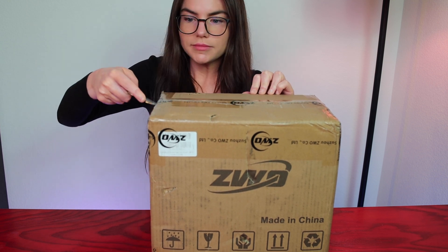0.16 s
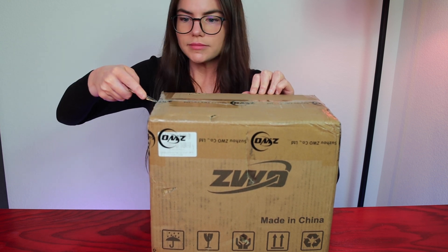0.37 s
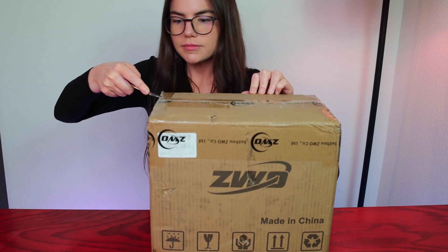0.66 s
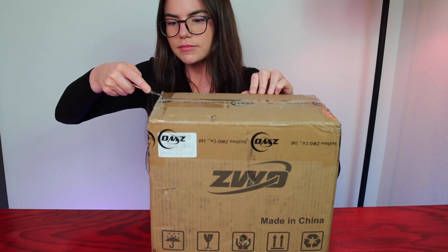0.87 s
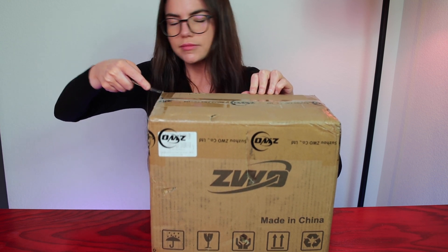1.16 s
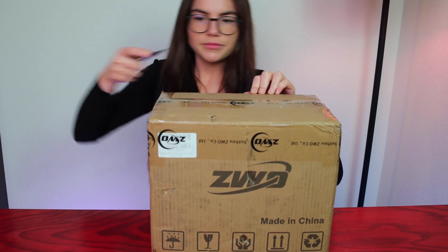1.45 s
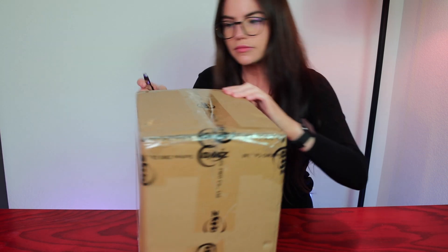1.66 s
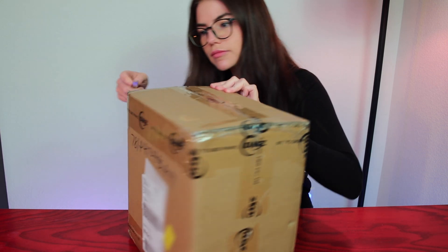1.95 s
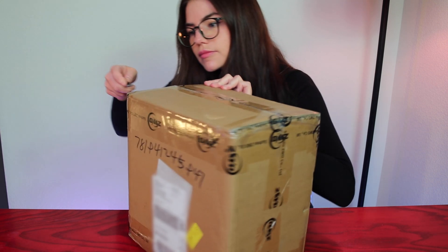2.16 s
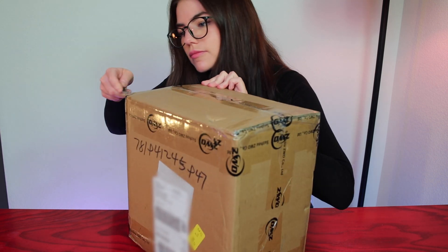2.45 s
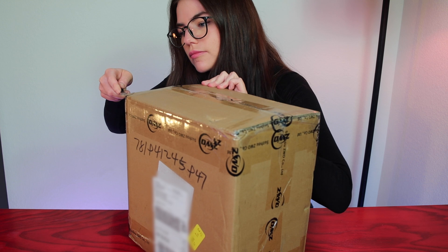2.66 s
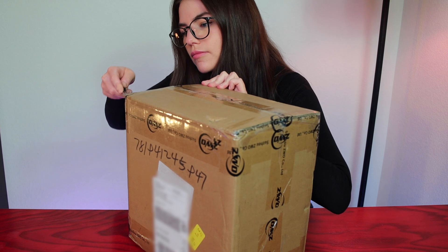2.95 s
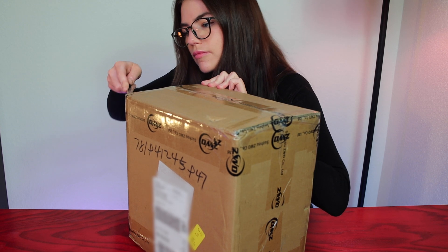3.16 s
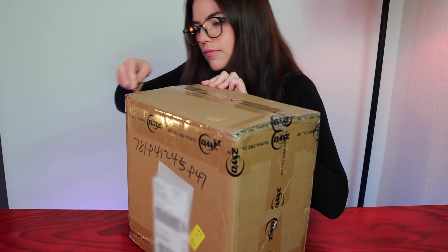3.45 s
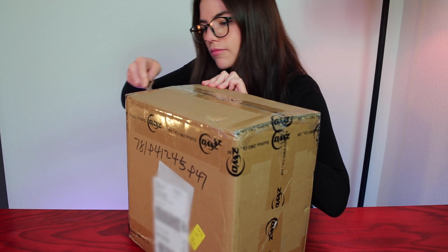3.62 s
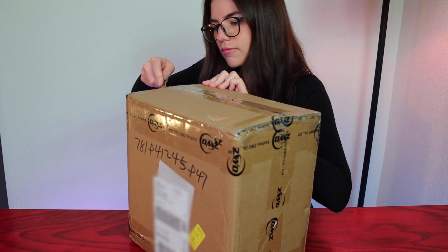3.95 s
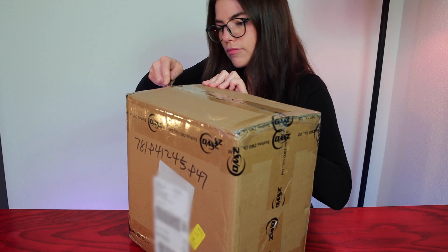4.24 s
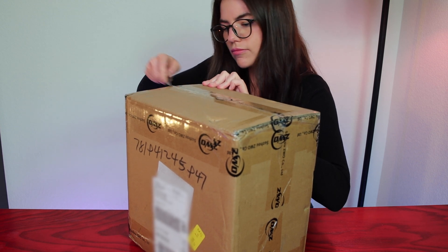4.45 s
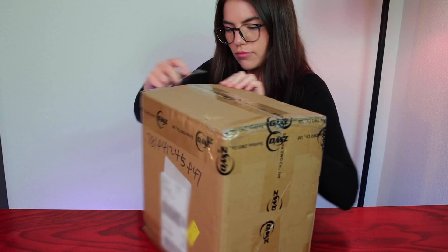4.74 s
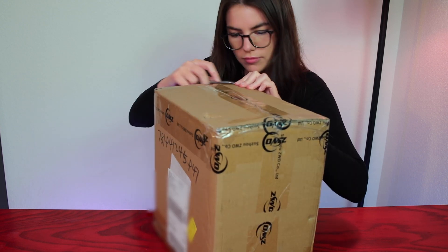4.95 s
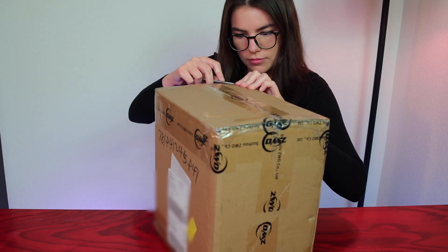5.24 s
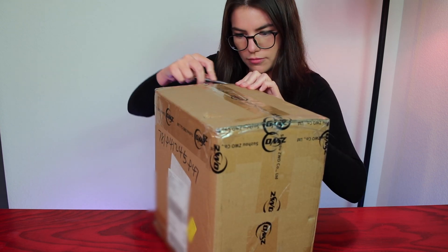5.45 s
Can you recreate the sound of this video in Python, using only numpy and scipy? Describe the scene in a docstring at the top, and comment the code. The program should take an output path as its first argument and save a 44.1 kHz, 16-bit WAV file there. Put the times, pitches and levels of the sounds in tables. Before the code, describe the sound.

A box cutter pops through packing tape and rasps along the edge of a large cardboard box, making the panels boom hollowly. The box is turned, hissing and scuffing over a table, with a few tape clicks. Then the blade cuts the top seam in rough, snapping strokes, pausing for one more brief turn. Everything is close to the microphone in a small room with a faint fan hum.

```python
"""A box cutter pops through packing tape and rasps along the side edge of a big cardboard box.
The blade moves in tiny slips that set the panels booming, while the tape fizzes as it tears.
The box is turned and hisses over the table top, then the top seam is cut, with one more turn midway.
It is all close by in a small room, where a fan hums faintly."""
import sys
import numpy as np
from scipy import signal
from scipy.fft import rfft, irfft, next_fast_len
from scipy.io import wavfile

SR = 44100
rng = np.random.default_rng(int(sys.argv[2]) if len(sys.argv) > 2 else 0)


def put_to_file(sound):
    """Save the sound as 16-bit audio at rate SR, in the file named by the first command-line argument."""
    columns = np.atleast_2d(sound).T  # one column per channel
    safe = np.clip(columns, -1, 1)
    whole_steps = np.round(safe * 32767)
    wavfile.write(sys.argv[1], SR, whole_steps.astype(np.int16))


N = 246078
TIME = np.arange(N) / SR


def from_db(db):
    """Turn decibels into a gain."""
    return 10 ** (np.asarray(db) / 20)


def unit(response):
    """Scale a response so that white noise keeps its power going through it."""
    return response / np.sqrt(np.sum(response ** 2) + 1e-20)


def through(x, response):
    """Play x through something that answers one tap with this response."""
    return signal.fftconvolve(x, response)[:N]


def at_hz(points, hz):
    """Read a table between its rows, with octaves evenly spaced."""
    known_hz, values = np.transpose(points)
    return np.interp(np.log(np.maximum(hz, 1)), np.log(known_hz), values)


def colour(spectrum, size=4096):
    """The quickest (minimum-phase) response to a tap that has this tone colour."""
    gains = from_db(at_hz(spectrum, np.fft.rfftfreq(size, 1 / SR)))
    cepstrum = irfft(np.log(gains))
    cepstrum[1:size // 2] *= 2
    cepstrum[size // 2 + 1:] = 0
    return unit(irfft(np.exp(rfft(cepstrum))))


def ringing(notes, t):
    """A tapped object rings with several fading notes at once."""
    return unit(sum((-1) ** k * from_db(db - 60 * t / fade_s) * np.sin(2 * np.pi * hz * t)
                    for k, (hz, db, fade_s) in enumerate(notes)))


def drift(per_s):
    """A random wander, about 1 in size, with per_s new values a second."""
    knots = rng.standard_normal(N // 50)
    wander = np.interp(TIME * per_s, np.arange(len(knots)), knots)
    return wander / np.std(wander)


def swell(peak_s, rise_s, fall_s, swing_db=22):
    """Gain of one push: it climbs by swing_db to 1 at the peak and eases off again."""
    away = np.maximum((peak_s - TIME) / rise_s, (TIME - peak_s) / fall_s)
    return from_db(-swing_db * np.clip(away, 0, 10) ** 1.147)   # power 1 = pointed peak, 2 = rounded


# tone colour of the fan's air: f/Hz, level/dB
FAN_AIR = [(15, -46), (25, -26), (123, -11.5), (185, -13.5), (242, -7.5), (317, -10), (354, -13),
           (607, -22), (754, -20.5), (818, -21), (962, -28), (4870, -38), (5730, -35.5), (13600, -39.5),
           (16000, -39)]
def fan(air_db, hum_db, hum_hz):
    """A dull rush of air with a wavering hum."""
    air = from_db(air_db) * through(rng.standard_normal(N), colour(FAN_AIR))
    phase = 2 * np.pi * np.cumsum(hum_hz + 5.82 * drift(30)) / SR
    return air + from_db(hum_db + 3.5 * drift(9)) * np.sqrt(2) * np.sin(phase)


# how long the room's echo lasts: f/Hz, time to fade by 60 dB/s
ROOM_FADE = [(150, 0.067), (1000, 0.28), (5000, 0.23), (14000, 0.13)]
def room(x, echo_db, treble_db, first_s):
    """Echoes off the walls begin a moment late and die away, each band at its own pace."""
    t, tail = TIME[:SR // 2], 0
    edges_hz = np.geomspace(170, 17000, 8)
    for low, high in zip(edges_hz, edges_hz[1:]):
        bandpass = signal.butter(2, [low, high], "band", fs=SR, output="sos")
        band = signal.sosfilt(bandpass, rng.standard_normal(len(t)))
        hz = np.sqrt(low * high)
        tail = tail + band * from_db(treble_db * np.log10(hz / 1000) - 60 * t / at_hz(ROOM_FADE, hz))
    onset = np.clip(t / first_s - 1, 0, 1)
    return from_db(echo_db) * through(x, unit(tail * onset))


# notes of the cardboard panels and the air inside:
# f/Hz, time to fade by 60 dB/s, level touched at the edge/dB, level touched on the top seam/dB
BOX_NOTES = [(66.6, 0.1, -7.5, -7), (106.7, 0.076, -1.5, -1.5), (141.6, 0.12, -4, -4.5),
             (166.7, 0.15, -7.5, -9.5), (263, 0.049, -1, 6), (321, 0.083, -5, 4), (378, 0.052, -4, 1.5),
             (419, 0.032, -2, 7.5), (559.5, 0.08, -5.5, -26)]
def panels(place):
    """The box rings: where it is touched decides how loud each note is."""
    notes = [(hz, edge_db if place == "edge" else seam_db, fade_s)
             for hz, fade_s, edge_db, seam_db in BOX_NOTES]
    return ringing(notes, TIME[:SR // 4])


# shoves that turn the box: start t/s, length/s, relative hiss at full speed/dB
SHOVES = [(1.516, 0.49, -43), (1.774, 0.67, -42), (4.612, 0.51, -44.5)]
# the box's bottom catches on the table: peak t/s, relative hiss/dB, relative rumble/dB
SCUFFS = [(1.56, -50.5, -40.5), (1.825, -61, -46), (2.095, -42.5, -36.5), (4.665, -67, -36.5)]
# tone colour of the sliding: f/Hz, level/dB
SLIDE_HISS = [(210, -1), (350, 3.5), (622, -3), (943, -3.5), (1070, 0), (1760, -5), (1910, -4), (2750, -6),
              (2980, -10), (5660, -9), (11800, -14.5), (14100, -10), (16000, -19)]
def sliding(hiss_gain_db, rumble_gain_db):
    """Cardboard on a smooth table hisses more as it speeds up; the panels rumble where it catches."""
    hiss = 0
    for start_s, length_s, db in SHOVES:
        speed = np.abs(np.sin(np.pi * np.clip((TIME - start_s) / length_s, 0, 1)))
        hiss = hiss + from_db(db) * speed ** 1.35
    rumble = hiss * from_db(-18.5)
    for s, hiss_db, rumble_db in SCUFFS:
        catch = swell(s, rise_s=0.051, fall_s=0.082)
        hiss = np.hypot(hiss, catch * from_db(hiss_db))
        rumble = np.hypot(rumble, catch * from_db(rumble_db))
    friction = rng.standard_normal(N) * from_db(0.36 * drift(51))
    return (from_db(hiss_gain_db) * through(friction * hiss, colour(SLIDE_HISS))
            + from_db(rumble_gain_db) * through(friction * rumble, panels("seam")))


# the blade or a hand bumps the cardboard: t/s, clack/dB, thump/dB
KNOCKS = [(0.0504, -23, -28), (0.1355, -33, -28.5), (0.2921, -30, -18), (0.3878, -30, -32.5),
          (.8854, -40, -31), (1.261, -39, -28), (1.4597, -43.5, -38), (1.814, -42, -37),
          (3.0902, -40.5, -37.5), (3.1973, -31, -34), (4.1622, -28.5, -24.5), (5.1432, -42.5, -53)]
# tape and cardboard click under the hands: t/s, crack/dB, crack f/Hz, clack/dB
CLICKS = [ (0.0486, -18.5, 5000, -28.5), (0.3883, -25.5, 3220, -47), (.4661, -34, 3630, -41),
          (0.8839, -23.5, 2680, -48), (1.5263, -29.5, 3470, -68), (1.8878, -15, 5400, -34),
          (1.899, -18, 5100, -35.5), (2.08, -27, 3600, -34.5), (2.451, -28, 4040, -42.5),
          (2.859, -28.5, 4900, -49), (2.987, -31, 4570, -41.5), (3.9629, -34.5, 3680, -53),
          (4.0415, -28.5, 3700, -39.5), (4.35, -37.5, 3730, -48), (5.1433, -37.5, 4600, -59),
          (5.3174, -26, 5310, -40), ]
# the blade breaks through tight tape: t/s, crack/dB, crack f/Hz, clack/dB, tick/dB
POPS = [ (0.0228, -29, 4530, -38, -43), (0.0538, -20, 2590, -32, -31), (0.2903, -16.5, 6100, -26, -44),
        (0.5341, -21, 4530, -34.5, -31.5), (0.6083, -16, 4660, -27.5, -21.5),
        (.619, -5.5, 3730, -17.5, -23.5), (1.0364, -21, 2560, -23, -21), (1.2874, -12, 2830, -30.5, -11.5),
        (3.5419, -37, 2800, -25, -24), (3.6881, -18, 3070, -26, -28), (3.8682, -12.5, 4200, -21.5, -46),
        (4.1449, -17, 4300, -21, -25.5), (4.5445, -16, 3870, -43, -15.5), (4.6195, -33, 6900, -37.5, -39),
        (5.328, -19, 3860, -29.5, -28.5), (5.5322, -19, 4560, -24.5, -26.5), ]
def contacts():
    """All snaps, at relative levels: t/s, crack/dB, crack f/Hz, thump/dB, clack/dB, tick/dB."""
    pops = [(s, crack, hz, clack - 6, clack, tick) for s, crack, hz, clack, tick in POPS]
    clicks = [(s, crack, hz, crack - 29.5, clack, crack - 44) for s, crack, hz, clack in CLICKS]
    knocks = [(s, clack - 1.5, 2900, thump, clack, clack - 22) for s, clack, thump in KNOCKS]
    return pops + clicks + knocks


def thumps(gain_db, flex, lowest_dent_hz, dent_s, stiffening):
    """At each snap the panel springs back: a quick flex at the spot, then the whole box rings."""
    t, out, ring = TIME[:SR // 4], np.zeros(N + SR), panels("edge")
    hardest_db = np.array(contacts())[:, 3].max()
    for s, _, _, thump_db, _, _ in contacts():
        start = round(s * SR)
        # a light touch bends a smaller, stiffer patch, which sounds higher
        hz = lowest_dent_hz * from_db(stiffening * (hardest_db - thump_db))
        dent = unit(np.sin(2 * np.pi * hz * t) * np.exp(-t / dent_s))
        out[start:start + len(t)] += from_db(thump_db + gain_db) * unit(ring + flex * dent)
    return out[:N]


def fracture(response, decay_s):
    """A pop is a run of tiny breaks that dies within milliseconds."""
    t = TIME[:SR // 50]
    breaks = rng.choice([-1, 1], len(t)) * np.minimum(t / .0002, 1) * np.exp(-t / decay_s)
    return unit(signal.fftconvolve(breaks, response))


# tone colour of the cardboard's clack: f/Hz, level/dB
BOARD_CLACK = [(150, -28), (450, -3.5), (680, 0), (1200, -1), (2200, -8.5), (3200, -21.5), (8000, -38)]
# tone colour of the tape's crack: multiple of its pitch, level/dB
TAPE_CRACK = [(.22, -18.5), (.65, -1), (1, 3.5), (1.5, -1.5), (2.8, -15.5)]
# tone colour of the tape's bright tick: f/Hz, level/dB
TAPE_TICK = [(1500, -42), (3500, -28), (7500, -8.5), (9500, -10), (12200, -1.5), (14500, -5), (16000, -3.5)]
def snaps(clack_gain_db, crack_gain_db, tick_gain_db):
    """Tension lets go at once: the tape ticks and cracks, the cardboard clacks."""
    out = np.zeros(N + SR)
    clack, tick = colour(BOARD_CLACK), colour(TAPE_TICK)
    for s, crack_db, crack_hz, _, clack_db, tick_db in contacts():
        start = round(s * SR)
        crack = colour([(crack_hz * multiple, db) for multiple, db in TAPE_CRACK], size=1024)
        for db, part in [(clack_db + clack_gain_db, fracture(clack, decay_s=0.0055)),
                         (crack_db + crack_gain_db, fracture(crack, decay_s=0.0017)),
                         (tick_db + tick_gain_db, fracture(tick, decay_s=0.0011))]:
            out[start:start + len(part)] += from_db(db) * part
    return out[:N]


def slips(per_s, spread_db, judder_db, rub):
    """Sticking and slipping: tiny clicks of uneven size in bunches, over smooth rubbing."""
    sizes = from_db(spread_db * np.minimum(rng.exponential(1, N), 4)) * rng.choice([-1, 1], N)
    clicks = sizes * (rng.random(N) < per_s / SR)
    force = clicks / np.std(clicks) + rub * rng.standard_normal(N)
    force *= from_db(judder_db * drift(220))
    return force / np.std(force)


def flicker(x, depth_db, per_s):
    """Each torn fibre and spot on the cardboard favours other pitches, so each band flickers alone."""
    size = 2 * next_fast_len(N // 2 + 1)
    spectrum, hz = rfft(x, size), np.fft.rfftfreq(size, 1 / SR)
    centres_hz = np.linspace(np.sqrt(300), np.sqrt(16000), 16) ** 2
    out = 0
    for weights in np.eye(len(centres_hz)):
        band = irfft(spectrum * np.interp(hz, centres_hz, weights))[:N]
        out = out + band * from_db(depth_db * drift(per_s))
    return out / np.std(out)


# notes of the thin blade: f/Hz, level/dB, time to fade by 60 dB/s
BLADE_NOTES = [(2300, -15, 0.0057), (2530, 3.5, 0.062), (2700, -1, 0.024)]
def blade(pushes, force, gain_db, growth, sunk_s):
    """The dragged blade sings; this grows more slowly than the pressure, so light pushes show it most."""
    pressure = np.max([from_db(db) * swell(s, rise, fall) for s, rise, fall, db, *_ in pushes], axis=0)
    shallow_db = np.where(TIME < sunk_s, -20, 0)   # quieter until it has sunk through the tape
    drive = force * from_db(gain_db + shallow_db) * pressure ** growth
    return through(drive, ringing(BLADE_NOTES, TIME[:SR // 20]))


# tone colour of tearing tape: f/Hz, level/dB
TAPE_FIZZ = [(1500, -23.5), (4200, 10), (6500, 6), (9300, -3.5), (11500, -1), (13000, -3.5), (14200, 5),
             (16000, -14)]
def cutting(place, pushes, rasp_colour, force, tearing, rasp_gain_db, boom_gain_db, fizz_gain_db):
    """The blade's slips rasp in the cardboard and shake the panels; the tape tears in a gritty fizz."""
    rasp, boom, fizz = np.zeros((3, N))
    for peak_s, rise_s, fall_s, db, boom_db, fizz_db in pushes:
        pressure = from_db(db) * swell(peak_s, rise_s, fall_s)
        rasp = np.maximum(rasp, pressure * from_db(rasp_gain_db))
        boom = np.maximum(boom, pressure * from_db(boom_db + boom_gain_db))
        fizz = np.maximum(fizz, pressure * from_db(fizz_db + fizz_gain_db))
    return (through(force * rasp, colour(rasp_colour))
            + through(force * boom, panels(place))
            + through((force + tearing) / np.sqrt(2) * fizz, colour(TAPE_FIZZ)))


# pushes along the side edge: peak t/s, rise/s, fall/s, level/dB, extra boom/dB, extra fizz/dB
EDGE_PUSHES = [ (0.031, 0.077, 0.025, -41.5, 8, -16), (0.067, 0.022, 0.089, -34, 3, -4),
               (.162, 0.086, 0.065, -39, -9, -10.5), (.307, 0.024, 0.16, -35.5, -1, -4.5),
               (0.437, 0.32, 0.03, -40.5, 0, -10.5), (.555, .012, 0.049, -42, 3.5, -7),
               (0.603, 0.012, 0.1, -30.5, 0.5, -6), (0.72, .13, 0.085, -29.5, -4, -13),
               (.891, 0.064, 0.061, -35, -3.5, -11.5), (0.964, 0.1, 0.037, -35, -4, -9.5),
               (1.038, 0.11, 0.064, -26.5, -4, -8), (1.138, .018, 0.039, -45, -12, -15),
               (1.26, 0.094, 0.035, -31.5, -1.5, -9), ]
# tone colour of the rasp at the edge: f/Hz, level/dB
EDGE_RASP = [(200, -31.5), (500, 1.5), (800, 0), (1080, 3.5), (1400, -3), (1650, 0), (1880, -5.5),
             (2150, 0), (2720, -5.5), (3050, -11), (3700, -5), (6000, -17), (12000, -30)]
def edge_cut(tearing):
    """The blade drags along the side edge in fine, dense slips that also make it sing."""
    force = flicker(slips(per_s=3500, spread_db=2, judder_db=3.5, rub=0.65), depth_db=2.5, per_s=100)
    cut = cutting("edge", EDGE_PUSHES, EDGE_RASP, force, tearing,
                  rasp_gain_db=-0.5, boom_gain_db=0, fizz_gain_db=-1.5)
    return cut + blade(EDGE_PUSHES, force, gain_db=-32, growth=0.43, sunk_s=0.62)


# pushes along the top seam: peak t/s, rise/s, fall/s, level/dB, extra boom/dB, extra fizz/dB
SEAM_PUSHES = [ (3.093, 0.02, 0.098, -48, 6, -10), (3.198, 0.0095, 0.046, -35.5, 0, -10),
               (3.542, 0.016, 0.24, -27.5, -0.5, -7.5), (3.73, 0.15, .2, -30.5, 0.5, -8),
               (3.872, 0.055, .08, -33, -3.5, -9), (4.171, 0.041, 0.036, -29.5, 0.5, -7),
               (4.526, 0.051, 0.049, -42, -2, -4), (5.45, 0.12, 0.26, -47, -3.5, -4),
               (5.506, 0.022, 0.079, -28, -6, -8), (5.565, 0.048, .12, -32.5, 1.5, -2.5), ]
# tone colour of the rasp on the seam: f/Hz, level/dB
SEAM_RASP = [(200, -49.5), (500, 0), (720, 0), (880, -6.5), (1080, 3.5), (1420, 2), (1800, -4),
             (2300, -7.5), (3200, -7.5), (4200, -22), (7000, -20.5), (12000, -44)]
def seam_cut(tearing):
    """The blade runs along the top seam in fewer, rougher slips."""
    force = flicker(slips(per_s=2400, spread_db=3.5, judder_db=2.5, rub=0.37), depth_db=3, per_s=140)
    return cutting("seam", SEAM_PUSHES, SEAM_RASP, force, tearing,
                   rasp_gain_db=0.5, boom_gain_db=2, fizz_gain_db=1.2)


def scene():
    """The box, its echoes and the fan reach one microphone, alike in both channels."""
    tearing = flicker(slips(per_s=1800, spread_db=3, judder_db=1.5, rub=0.3), depth_db=5.5, per_s=330)
    box = edge_cut(tearing) + seam_cut(tearing)
    box += sliding(hiss_gain_db=-1, rumble_gain_db=-5.5)
    box += thumps(gain_db=21.5, flex=1.4, lowest_dent_hz=287, dent_s=0.0038, stiffening=0.23)
    # a pop sends a different ripple each way: one to the microphone, two to the walls
    direct, *to_walls = [box + snaps(clack_gain_db=21.5, crack_gain_db=9.5, tick_gain_db=16)
                         for _ in range(3)]
    echoes = sum(room(sound, echo_db=-13.5, treble_db=2, first_s=0.0022) for sound in to_walls)
    mono = direct + echoes + fan(air_db=-52, hum_db=-58, hum_hz=239.5)
    return np.stack([mono, mono])


def record(dry, bass_hz=54, ceiling=0.52, top_hz=16000):
    """The microphone thins the deep bass; the hardest pops are rounded and the highest treble is cut."""
    thinned = signal.sosfilt(signal.butter(4, bass_hz, "high", fs=SR, output="sos"), dry)
    rounded = ceiling * np.tanh(thinned / ceiling)
    return signal.sosfilt(signal.ellip(10, .1, 80, top_hz, fs=SR, output="sos"), rounded)


dry = scene()
out = record(dry)
put_to_file(out)
```